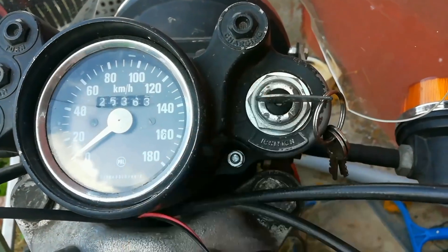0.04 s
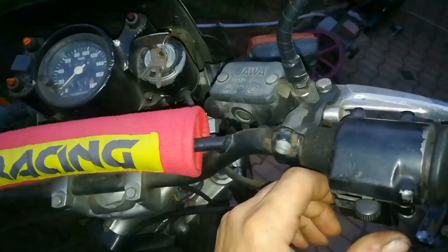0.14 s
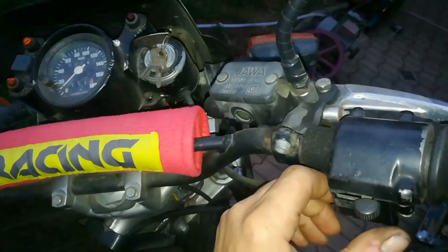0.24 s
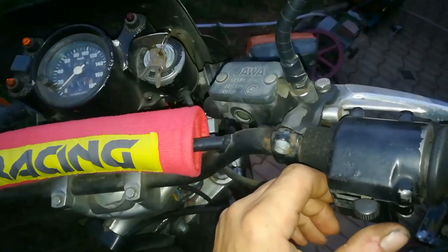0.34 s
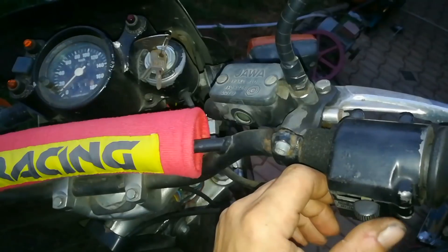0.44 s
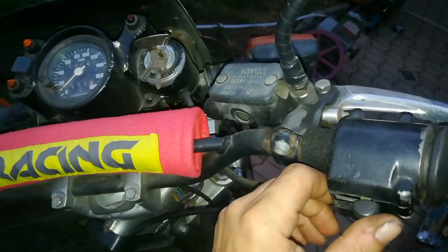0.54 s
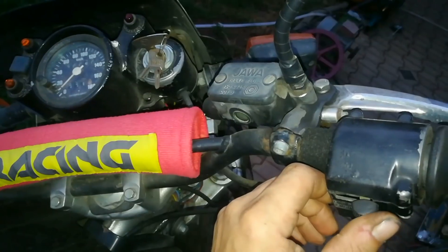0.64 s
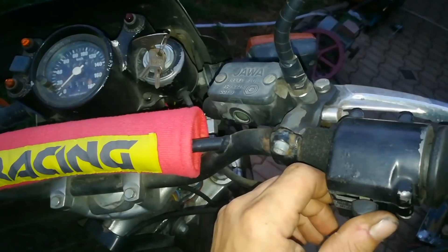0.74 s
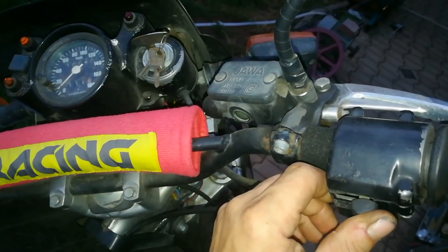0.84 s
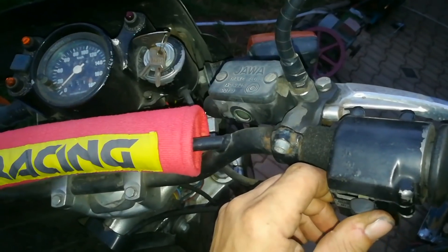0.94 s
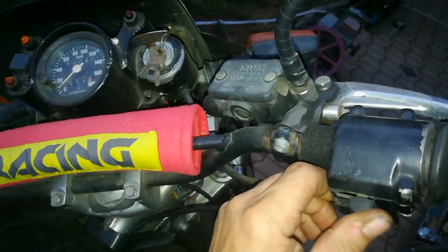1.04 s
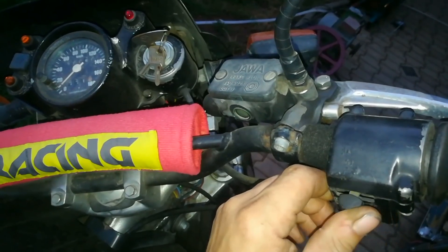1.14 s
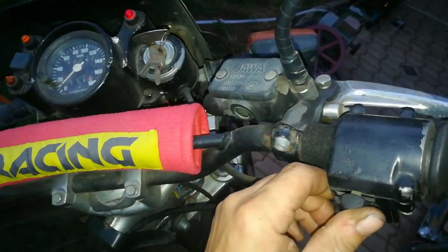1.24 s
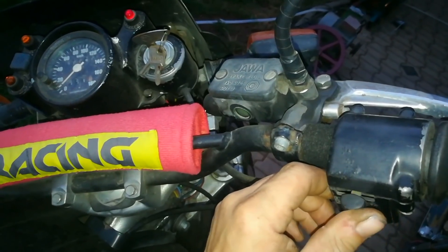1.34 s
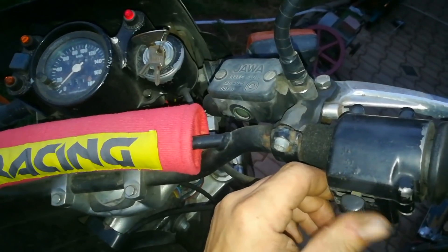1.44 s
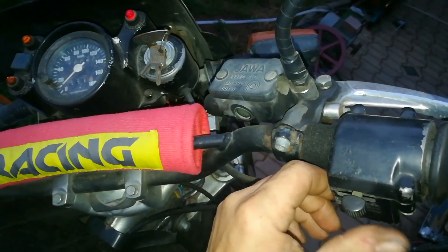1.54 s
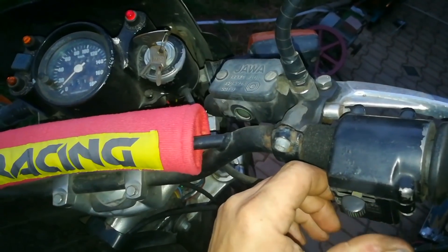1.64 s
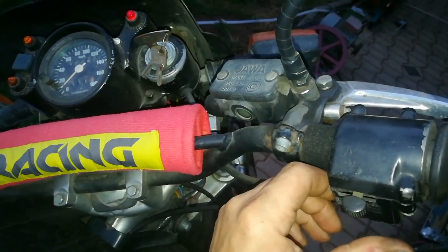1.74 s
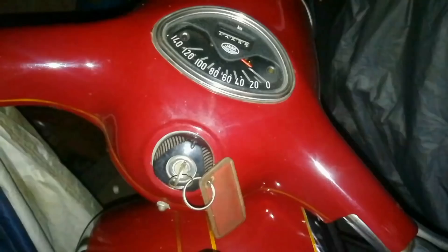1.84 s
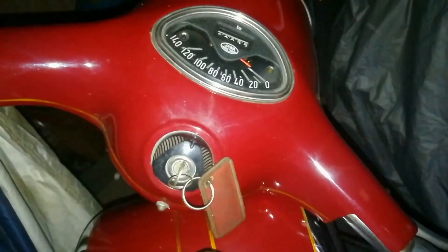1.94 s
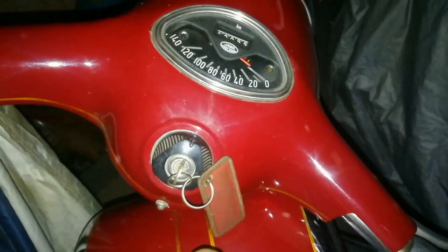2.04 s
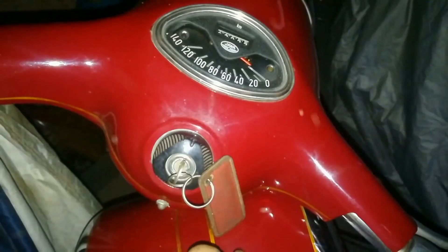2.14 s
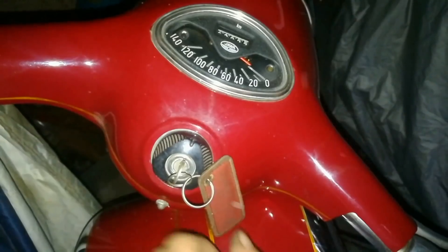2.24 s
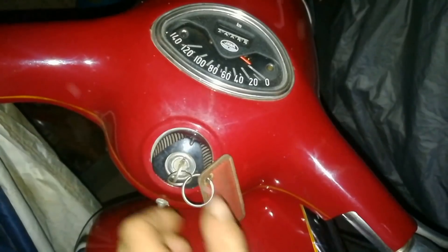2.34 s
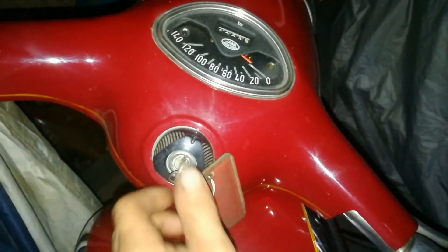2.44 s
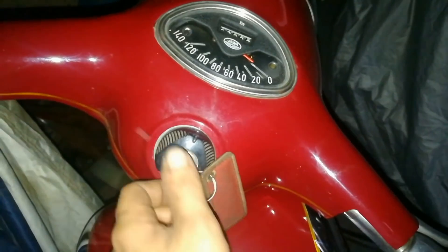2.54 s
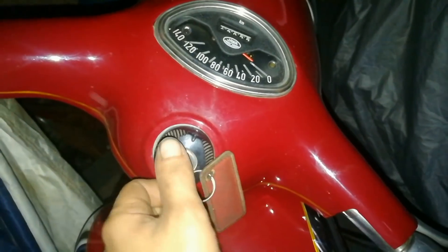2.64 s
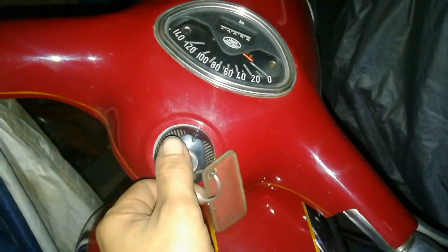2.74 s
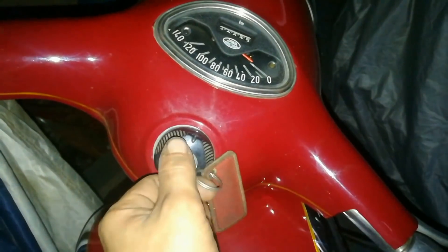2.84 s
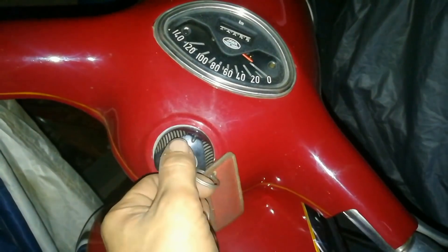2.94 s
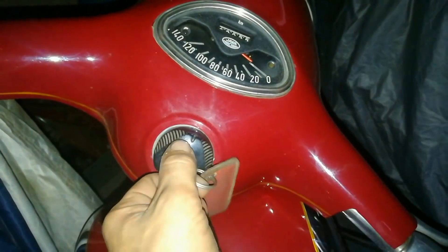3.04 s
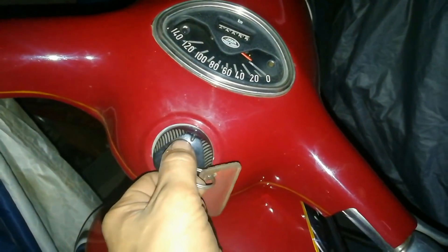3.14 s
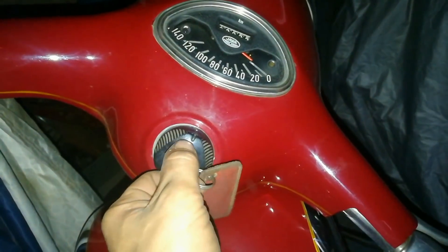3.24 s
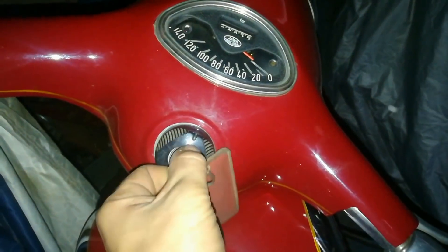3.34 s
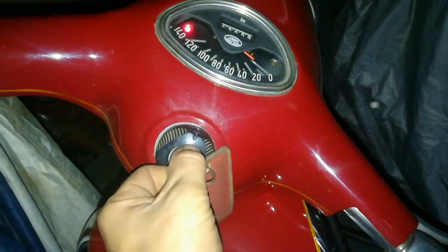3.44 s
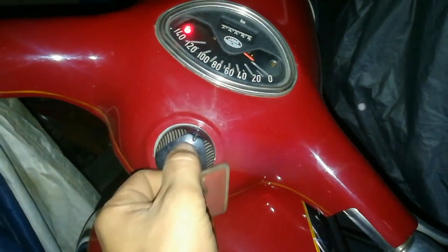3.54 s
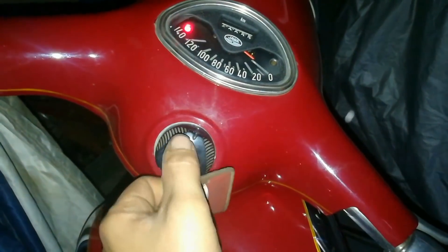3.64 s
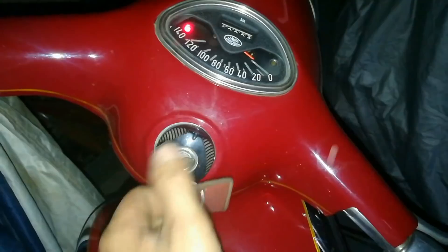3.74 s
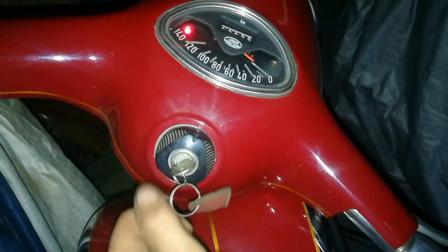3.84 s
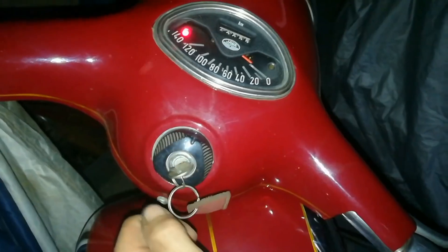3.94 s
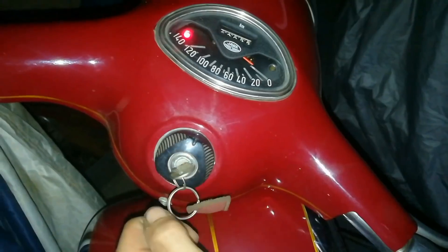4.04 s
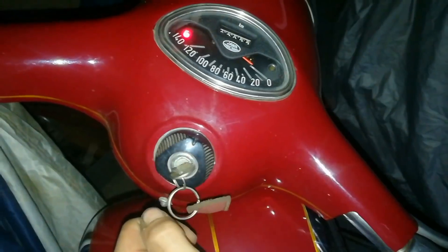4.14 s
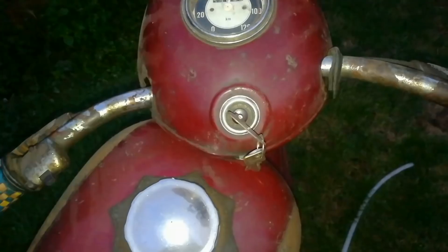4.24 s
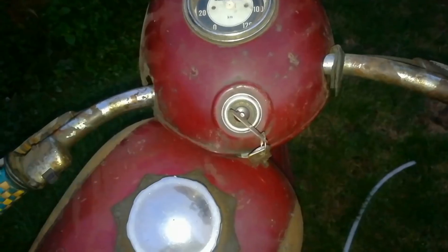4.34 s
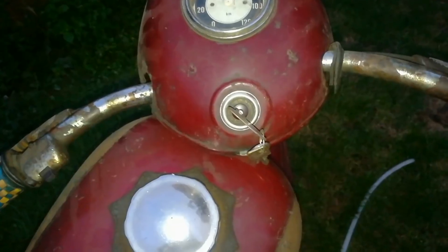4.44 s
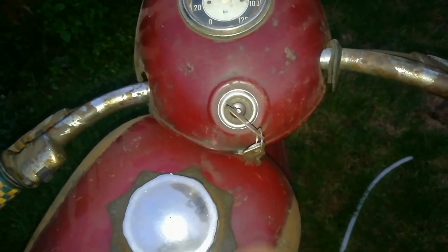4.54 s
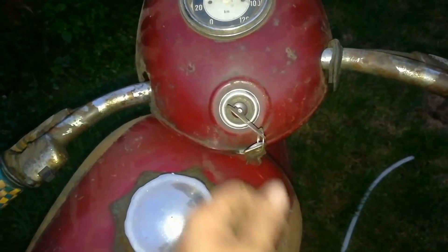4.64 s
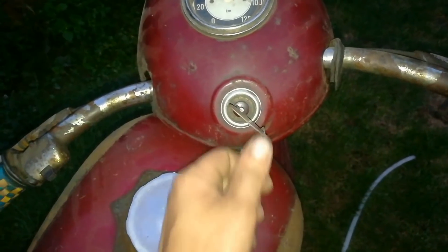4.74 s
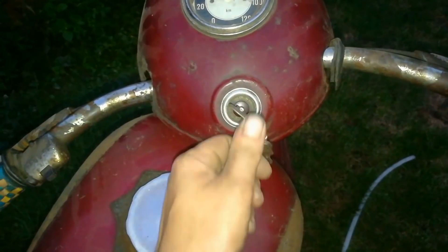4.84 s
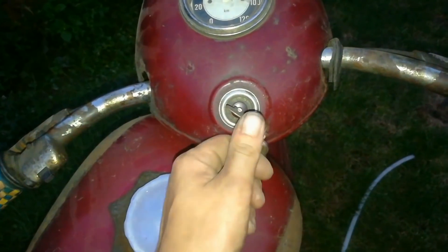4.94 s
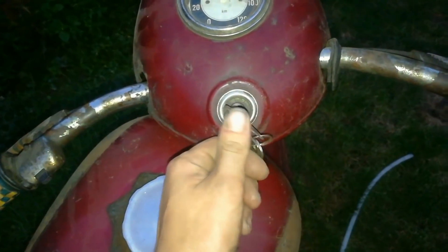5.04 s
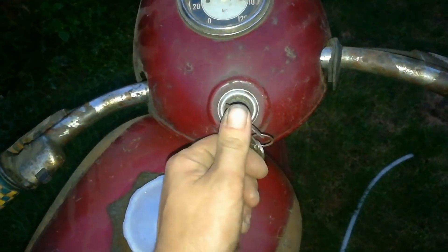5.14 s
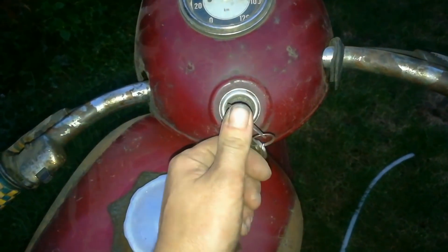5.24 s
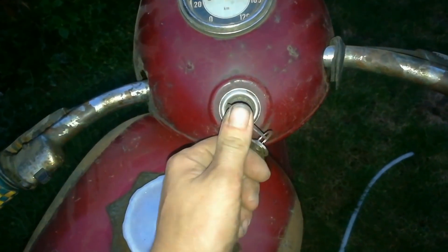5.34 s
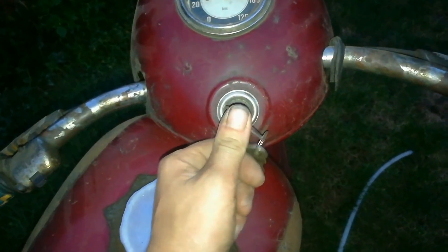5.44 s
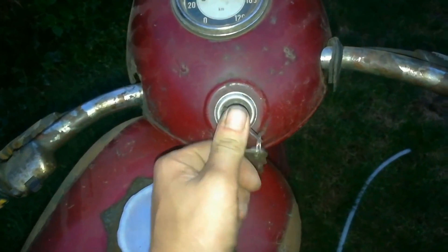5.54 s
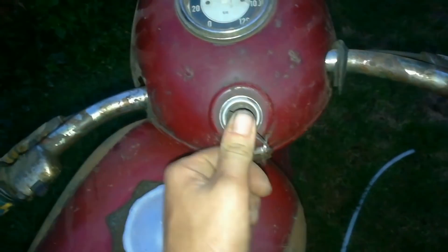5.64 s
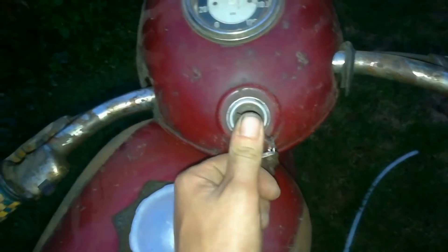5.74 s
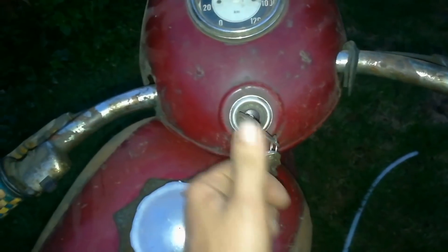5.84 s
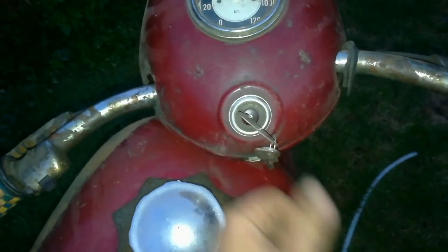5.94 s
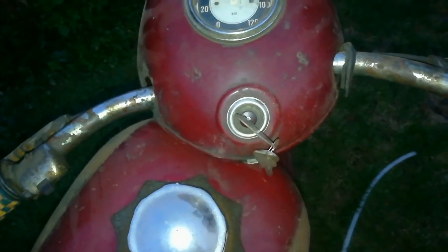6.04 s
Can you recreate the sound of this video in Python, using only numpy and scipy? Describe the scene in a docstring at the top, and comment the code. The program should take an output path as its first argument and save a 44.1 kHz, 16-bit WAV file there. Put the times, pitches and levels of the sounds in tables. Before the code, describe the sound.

Close, dry lock clicks on three old motorbikes outdoors at evening, the first and last loudest, over quiet swelling hiss and pulsing crickets.

```python
"""Outdoors in the evening, keys are turned on three motorbikes, one after another.
Lock parts snap as grainy noise cracks, and the bodies ring on with low and high damped modes.
Scrapes and rubbing are swelling noise, pins and thuds short damped notes; a key ring tinkles on thin modes.
Crickets pulse in narrow, noise-roughened tones with broad swells of hiss, over hiss and rumble that
swell and sink, after a low buffet on the microphone. The level dips briefly twice."""
import sys
import numpy as np
from scipy import signal
from scipy.fft import rfft, irfft
from scipy.io import wavfile

SR = 44100
rng = np.random.default_rng(int(sys.argv[2]) if len(sys.argv) > 2 else 0)


def transcribe(u):
    """Save the signal u as a 16-bit wav file named by the first command-line argument.

    u: samples, shape (n,) or (channels, n), limited to [-1, 1]; the rate is SR.
    q: integer samples, one column per channel.
    """
    v = np.clip(np.atleast_2d(u).T, -1, 1)
    q = np.round(v * 32767).astype(np.int16)
    wavfile.write(sys.argv[1], SR, q)


N = 267995


def undb(db):
    """Decibels to gain."""
    return 10 ** (np.asarray(db) / 20)


def curve_db(points, hz):
    """Reads a curve of (Hz, dB) points, straight over log frequency and flat outside."""
    point_hz, point_db = np.transpose(points)
    return np.interp(np.log(hz), np.log(point_hz), point_db)


def colour(points, size, channels=2):
    """Unrelated noises of overall rms 1, shaped by (Hz, dB) points and falling away steeply outside."""
    hz = np.arange(1, size // 2 + 2) * SR / size
    low_hz, high_hz = points[0][0], points[-1][0]
    outside = np.maximum(np.log(low_hz / hz), 0) + np.maximum(np.log(hz / high_hz), 0)
    shape = undb(curve_db(points, hz) - 24 * outside)
    x = irfft(rfft(rng.standard_normal((channels, size))) * shape, size)
    return x / np.sqrt(np.mean(x ** 2))


def add(out, s, x, pan_db):
    """Mixes a stereo sound in at s seconds, left louder than right by pan_db."""
    i = int(s * SR)
    x = x[:, :N - i]
    out[:, i:i + x.shape[1]] += x * undb(np.array([[pan_db], [-pan_db]]) / 2)


def decay(t, t60):
    """Falls 60 dB in t60 seconds, never faster than in 2 ms."""
    return np.exp(-np.log(1000) * t / np.maximum(t60, .002))


# The swelling background. Each row: time in seconds, hiss level in dB, rumble level in dB.
AIR = [(0, -70, -48), (.16, -63.5, -53.5), (.3, -71, -67.5), (.45, -62, -58.5), (1.36, -63.5, -58.5),
       (1.48, -72, -63), (1.95, -73, -73), (2.08, -65.5, -68.5), (2.22, -57, -61.5), (2.35, -62.5, -61.5),
       (2.86, -61.5, -61), (3.25, -66, -59.5), (3.47, -70.5, -60.5), (3.85, -68.5, -63), (4.22, -72, -69),
       (4.27, -64.5, -63.5), (4.5, -61.5, -59), (5, -61, -63), (5.4, -69, -62.5), (5.62, -64.5, -65),
       (5.8, -78, -66.5), (6.07, -79, -70.5)]


def hiss_level(t):
    """Level of the hiss in dB at t seconds."""
    s, hiss_db, _ = np.transpose(AIR)
    return np.interp(t, s, hiss_db)


# Spectrum of the hiss. Each row: frequency in Hz, relative density in dB per Hz.
HISS_SPECTRUM = [(180, -23), (300, -8.5), (565, -16.5), (1040, -12), (1250, -13.5), (2480, -14.5),
                 (14000, -20), (16000, -17)]
# Spectrum of the rumble common to both sides. Each row: frequency in Hz, relative density in dB per Hz.
RUMBLE_SPECTRUM = [(8.8, -38), (15, 6.5), (59, 1), (97, 1), (152, -4.5), (234, -11), (600, -35),
                   (780, -44.5), (1320, -120)]
# Width of the rumble. Each row: frequency in Hz, side minus mid in dB.
RUMBLE_WIDTH = [(30, -32), (130, -12.5), (300, -4.5), (700, 22.5)]


def background():
    """Hiss is unrelated left and right; rumble is shared in the bass and spreads higher up."""
    t = np.arange(N) / SR
    s, _, rumble_db = np.transpose(AIR)
    hz, mid_db = np.transpose(RUMBLE_SPECTRUM)
    side_db = mid_db + curve_db(RUMBLE_WIDTH, hz)
    # overall strength of the side against the mid, from their summed power
    side_gain = np.sqrt(np.trapezoid(undb(2 * side_db), hz) / np.trapezoid(undb(2 * mid_db), hz))
    mid = colour(RUMBLE_SPECTRUM, N, channels=1)
    side = side_gain * colour(np.transpose([hz, side_db]), N, channels=1)
    rumble = mid + side * np.array([[1], [-1]])
    hiss = undb(hiss_level(t)) * colour(HISS_SPECTRUM, N)
    return hiss + undb(np.interp(t, s, rumble_db)) * rumble


# A low buffet on the microphone. Each row: time in seconds, swing frequency in Hz, drive level in dB.
BUFFET = [(0, 52, -57), (0.02, 100.7, -29.5), (0.045, 66, -32.5), (0.057, 76, -23.5), (0.073, 33.5, -30.5),
          (.12, 29.6, -32), (0.149, 33.8, -29), (0.165, 40, -44.5)]


def buffet(rough=0.42):
    """Air pushes the membrane in slow, slightly squared swings with a rough edge."""
    s, hz, db = np.transpose(BUFFET)
    t = np.arange(int(s[-1] * SR)) / SR
    cycles = np.cumsum(np.interp(t, s, hz)) / SR + rng.random()
    swing = np.tanh(0.52 * np.sin(2 * np.pi * cycles))
    wide_edge = 0.37 * colour([(40, -4.5), (150, -21), (500, -33)], len(t))
    shared_edge = colour([(40, 16.0), (150, -7.5), (500, -58)], len(t), channels=1)
    out = np.zeros((2, N))
    add(out, 0, undb(np.interp(t, s, db)) * (swing + rough * (wide_edge + shared_edge)), 0)
    return out


# Short knocks of the hand. Each row: start in seconds, pitch in Hz, level in dB, t60 in seconds.
THUDS = [(.015, 1000, -59, .03), (.059, 890, -51, .045), (.0612, 1430, -57, .04), (.0975, 2250, -57, 0.03),
         (.098, 490, -45.5, 0.18), (.124, 560, -54, 0.12), (2.555, 320, -60.5, 0.19),
         (3.542, 280, -52, 0.15), (3.645, 620, -68, 0.3), (3.665, 1230, -64, .07), (4.14, 68, -48, 0.13),
         (4.3, 620, -71, 0.29), (5.486, 200, -46, .05), (5.487, 640, -33, 0.03)]
# Pins drop inside the locks. Each row: start in seconds, pitch in Hz, level in dB, t60 in seconds.
PINS = [(1.102, 2450, -28, .018), (4.8897, 2430, -43, .025), (4.9075, 1600, -46, .03),
        (4.908, 4850, -46, .06), (4.917, 1450, -49, .05), (5.0198, 1850, -42, .03),
        (5.5135, 1680, -49, 0.04), (5.6537, 4280, -41, .02), (5.824, 2385, -64, 0.085)]


def knocks(events):
    """Each contact pushes into one damped resonance: a tone roughened by noise around its pitch."""
    out, t = np.zeros((2, N)), np.arange(8192) / SR
    for s, hz, db, t60 in events:
        roughness = 0.35 * colour([(hz * 0.7, -30), (hz, 0), (hz * 1.4, -30)], len(t))
        knock = np.sin(2 * np.pi * hz * t) + roughness
        attack = np.minimum(t / (0.015 * t60), 1)
        add(out, s, undb(db) * knock * decay(t, t60) * attack, 0)
    return out


BUILD_CYCLES = 2.9  # a mode takes this many cycles to build up, so the lows come late
LOOSE_HZ, LOOSEN_S = 900, 0.02  # modes below this ring steadier; the waver sets in over this time
APART_HZ, APART_SCATTER = 710, 0.37  # from here up a quarter cycle between microphones; scatter in radians


def ring(modes, t, blow, rough, scatter_db=1.5):
    """Damped modes weighted by the blow; loose parts waver, and each mode is out of step left to right."""
    hz, db, t60 = np.transpose(modes)[:, :, None]
    luck = rng.standard_normal((len(modes), 2))
    strength = undb(db + curve_db(blow, hz) + scatter_db * luck[:, :1])
    fading = strength * decay(t, t60) * np.minimum(t * hz / BUILD_CYCLES, 1)
    waver = colour([(15, 0.003), (90, 0.01)], len(t), channels=len(modes))
    loose = rough * np.minimum(hz / LOOSE_HZ, 1) * np.minimum(t / LOOSEN_S, 1)
    swaying = fading * (1 + loose * waver)
    apart = np.pi / 2 * np.minimum(hz / APART_HZ, 1) + APART_SCATTER * luck[:, 1:]
    phase = 2 * np.pi * hz * t
    left = np.sum(swaying * np.sin(phase + apart / 2), axis=0)
    right = np.sum(swaying * np.sin(phase - apart / 2), axis=0)
    return np.array([left, right])


# Snaps of metal parts on the three bikes. Each row: start in seconds, level in dB, bass in dB,
# treble in dB, t60 of the crack in seconds, left minus right in dB, ring in dB over the crack.
HANDLEBAR = [(0.098, -53.5, 7, -30, 0.034, 0, -22), (0.7665, -53, 2, -16, 0.068, -4, 0),
             (1.056, -59, 3.5, -18.5, 0.02, -6.5, -2.5), (1.1015, -29.5, -27, -9, 0.027, -14, -49),
             (1.1057, -15, -15, -6.5, 0.019, -5, -7.5)]
SCOOTER = [(2.47, -62.5, -10, 1, 0.26, -5, 2), (2.79, -50.5, -8, -2, 0.072, -4, -6.5),
           (3.06, -45, -15, -23, 0.08, -2.5, 4), (3.2905, -33.5, -4, -26, 0.054, -2, 1.5),
           (3.2985, -38, 11.5, 0, 0.015, -1, -18), (3.5385, -62.5, 2.5, -14, 0.02, -3, -18),
           (3.6245, -60.5, -11, -1.5, 0.043, -10, -24)]
HEADLAMP = [(4.889, -47.5, 0, -29, 0.045, 1, -6), (4.907, -44, -6, 1, 0.067, -5, 5.5),
            (5.02, -45, -4.5, -22, 0.075, -3, 4.5), (5.4868, -12.5, -20, -9.5, 0.015, -4, 9),
            (5.495, -33, 10.5, -15, 0.024, -6, -14.5), (5.6535, -48, -21, -7, 0.052, -11, -15),
            (5.675, -39.5, -28.5, -3.5, 0.039, -13, -14), (5.6797, -32.5, -32, -43, 0.02, 0, 5),
            (5.681, -42, -16.5, 23, 0.02, -22, -10.5), (5.9685, -32, -33.5, -13, 0.034, -1.5, -1),
            (5.997, -58, -28.5, -12, 0.093, -6, -8.5)]
# What each rings with. Each row: mode frequency in Hz, relative level in dB, t60 in seconds.
HANDLEBAR_MODES = [(872, -1, 0.05), (1730, -6, 0.04), (275, -13, 0.4), (2010, -6, 0.022), (2516, 1, .03),
                   (5030, 2, .02), (8740, 3, 0.025), (13230, -3, 0.033)]
SCOOTER_MODES = [(162.5, -1, 0.26), (373, -10, 0.4), (346.5, 12, 0.055), (587, -6.5, 0.19), (904, 1, 0.17),
                 (954, -1.5, 0.23), (1040, -9, 0.23), (1220, 15.5, 0.038), (1300, -2, 0.2),
                 (1550, -7.5, 0.12), (1950, -9.5, 0.25), (2780, 1, 0.072), (3286, 13.5, 0.032),
                 (4010, 15.5, 0.016)]
HEADLAMP_MODES = [(478, -33, 0.65), (319, -22.5, 0.12), (705, -18, 0.07), (1291, -18.5, 0.046),
                  (1630, -19, 0.068), (2660, -14.5, 0.029), (1760, -3, 0.03), (2160, -20, 0.013),
                  (3180, -17.5, 0.038), (4020, 3, 0.017), (4654, -10, 0.054), (6280, -5, 0.061),
                  (5620, 2.5, 0.033), (6090, 3, 0.023), (8700, -19.5, 0.033), (10280, -8.5, 0.02)]
CRACK_LOW_HZ, CRACK_LOW_DB = 300, -4.5  # the crack thins out below the body
WAVER = .5  # rms depth of the waver of loose parts


def snaps(events, modes, low_mid_db, tail_db, tail_s):
    """A grainy crack, a rattling tail from the parts around, and the ring of the body."""
    out, t = np.zeros((2, N)), np.arange(16384) / SR
    for s, db, bass_db, treble_db, t60, pan_db, ring_db in events:
        mid_db = bass_db / 2 + low_mid_db
        blow = [(600, bass_db - 1.0), (1200, bass_db), (1700, mid_db - 0.5), (2400, mid_db),
                (4000, -9.0), (6000, -13.5), (9000, treble_db), (14000, treble_db - 12.5)]
        grain = undb(1.8 * colour([(150, 0.00068), (500, 0.0035)], len(t), channels=1))
        crack_spectrum = [(CRACK_LOW_HZ, bass_db + CRACK_LOW_DB)] + blow
        fade = decay(t, t60) + undb(tail_db) * decay(t, tail_s)
        crack = grain * colour(crack_spectrum, len(t)) * fade
        body = undb(ring_db) * ring(modes, t, blow, rough=WAVER)
        attack = np.minimum(t / (.03 * t60), 1)
        add(out, s, undb(db) * (crack + body) * attack, pan_db)
    return out


SHADE_HZ = 6960


def shade_left(lock):
    """The hand shades the treble from the left microphone: a gentle low-pass."""
    lock[0] = signal.lfilter(*signal.butter(1, SHADE_HZ, fs=SR), lock[0])
    return lock


# Pulses in nearly even bouts. Each row: first pulse in seconds, last pulse in seconds,
# approximate spacing in seconds, cricket tone in dB over the hiss, swell in dB over the hiss.
BOUTS = [(0.436, .62, .168, -6, 1), (0.842, 0.984, .127, -5.5, -2.5), (1.542, 1.87, .17, -5.5, -1),
         (2.373, 2.59, .114, -4.5, -28), (3.643, 4.176, .113, -7.5, -8.5), (4.256, 5.441, .091, 0.5, 3),
         (5.804, 5.891, .091, 0, 2.5)]
# Spectrum of the broad swells of hiss. Each row: frequency in Hz, relative density in dB per Hz.
SWELL_SPECTRUM = [(1500, -8), (3500, -2.5), (6000, -5), (11000, -2.5), (15500, -9.5)]
PULSE_SCATTER_DB, PULSE_JITTER_S = 1.8, 0.004


def crickets(tone_hz=5380.0, spread_hz=110.0, tone_s=0.063, swell_s=0.07):
    """Each pulse swells and fades: a narrow, grainy cricket tone and a broad swell of hiss."""
    t, tones, swells = np.arange(N) / SR, np.zeros(N), np.zeros(N)
    for first, last, spacing, tone_db, swell_db in BOUTS:
        times = np.linspace(first, last, round((last - first) / spacing) + 1)
        for s, luck in zip(times, rng.standard_normal((len(times), 3))):
            late = t - s - PULSE_JITTER_S * luck[0]
            db = hiss_level(s) + PULSE_SCATTER_DB * luck[1]  # pulses follow the hiss
            tone = np.sin(2 * np.pi * (tone_hz + spread_hz * luck[2]) * t)
            tones = tones + undb(db + tone_db) * np.exp(-(late / tone_s * 2) ** 4) * tone
            swells = swells + undb(db + swell_db) * np.exp(-(late / swell_s * 2) ** 2)
    grain = colour([(30, 11), (300, 5.5), (700, -9.0)], N)  # noise that roughens the tones
    return tones * grain + swells * colour(SWELL_SPECTRUM, N)


# Scrapes and rubbing, some leading into a snap. Each row: start in seconds, end in seconds,
# level in dB, low edge in Hz, high edge in Hz.
SCRAPES = [(2.445, 2.757, -71, 585, 1560), (2.763, 2.792, -61.5, 2500, 5850),
           (3.281, 3.294, -43, 700, 6570), (4.859, 4.887, -63, 990, 4000),
           (5.47, 5.493, -36.5, 2010, 12740), (5.953, 5.967, -67.5, 3020, 10880)]


def scrapes():
    """A gritty scrape of band-limited noise that grows, then stops."""
    out = np.zeros((2, N))
    for start, end, db, low_hz, high_hz in SCRAPES:
        growth = np.linspace(0, 1, int((end - start) * SR)) ** 0.45
        grit = undb(4.8 * colour([(200, 0.0064), (600, 0.0085)], len(growth), channels=1))
        scrape = colour([(low_hz, 0), (high_hz, 0)], len(growth))
        add(out, start, undb(db) * growth * grit * scrape, -3.)
    return out


# The key ring touches the key. Each row: start in seconds, level in dB, tick pitch in Hz,
# left minus right in dB, ring in dB, blow on the lowest mode in dB.
TINKLES = [(4.8315, -34, 10720, -19.5, -15.5, 4.5), (4.9112, -43.5, 10940, -24.5, -16, -1),
           (5.495, -39, 11900, -15, -5, 5), (5.5095, -45, 10700, -15, -14, 0),
           (5.6087, -50, 11730, -26.5, -5.5, 6.5), (5.665, -51, 9400, -13, -11.5, 15),
           (6.0045, -54.5, 11200, -20, -12.5, 6.5)]
# The thin steel of the ring. Each row: mode frequency in Hz, relative level in dB, t60 in seconds.
KEY_RING_MODES = [(7672, -18, .45), (8478, 0, .15), (11940, -16, .1), (15470, -13, .09)]


def key_ring():
    """A bright tick with a short note of its own, then thin steel rings on."""
    out, t = np.zeros((2, N)), np.arange(16384) / SR
    for s, db, tick_hz, pan_db, ring_db, low_db in TINKLES:
        click = 0.71 * colour([(8000, -16.0), (11000, -1.5), (15000, -4.5)], len(t)) * decay(t, 0.021)
        note = np.sin(2 * np.pi * tick_hz * t) * decay(t, 0.017)
        steel = undb(ring_db) * ring(KEY_RING_MODES, t, [(7700, low_db), (8400, 0.0029)], rough=0.074)
        attack = np.minimum(t / 0.00058, 1)
        add(out, s, undb(db) * (click + note + steel) * attack, pan_db)
    return out


def scene():
    """All sources together."""
    handlebar = shade_left(snaps(HANDLEBAR, HANDLEBAR_MODES, low_mid_db=0.33, tail_db=-30.5, tail_s=0.27))
    scooter = snaps(SCOOTER, SCOOTER_MODES, low_mid_db=-0.96, tail_db=-12, tail_s=0.25)
    headlamp = shade_left(snaps(HEADLAMP, HEADLAMP_MODES, low_mid_db=-0.59, tail_db=-16, tail_s=0.13))
    locks = handlebar + scooter + headlamp + knocks(PINS)
    return background() + buffet() + knocks(THUDS) + locks + crickets() + scrapes() + key_ring()


# Brief dips in level. Each row: start in seconds, end in seconds, time to return in seconds, gain in dB.
DIPS = [(0.164, 0.209, 0.084, -28), (4.228, 4.241, 0.024, -31)]
CEILING = .8  # peaks bend towards this full-scale fraction
TOP_HZ = 15600


def record(dry):
    """The level dips briefly twice; the loudest peaks are rounded and the top is cut steeply."""
    t, gain = np.arange(N) / SR, 1
    for start, end, back, db in DIPS:
        gain = gain * undb(np.interp(t, [start - .002, start, end, end + back], [0, db, db, 0]))
    rounded = CEILING * np.tanh(dry * gain / CEILING)
    return signal.sosfilt(signal.ellip(10, .2, 70, TOP_HZ, fs=SR, output="sos"), rounded)


dry = scene()
out = record(dry)
transcribe(out)
```